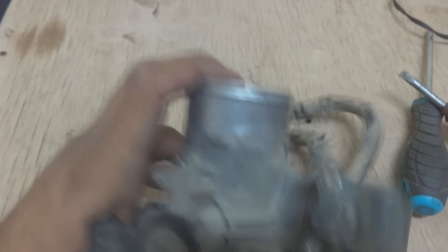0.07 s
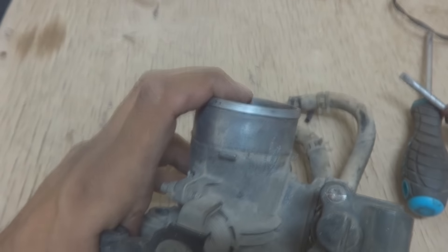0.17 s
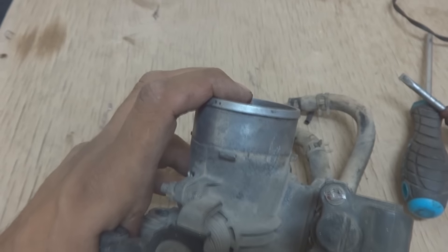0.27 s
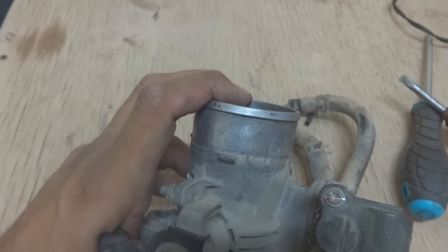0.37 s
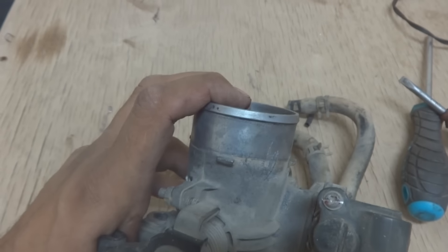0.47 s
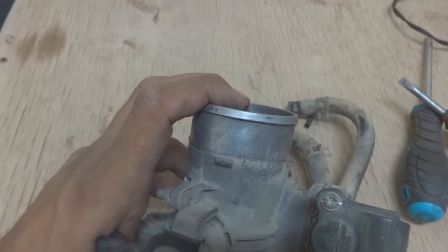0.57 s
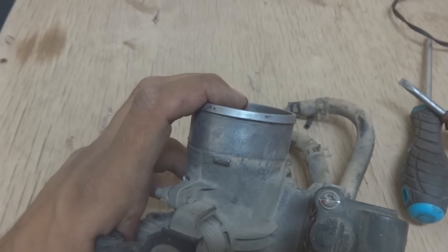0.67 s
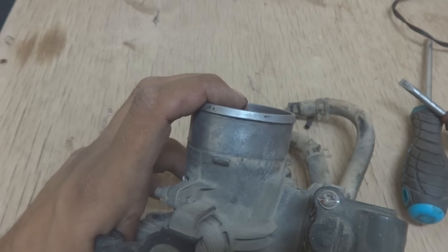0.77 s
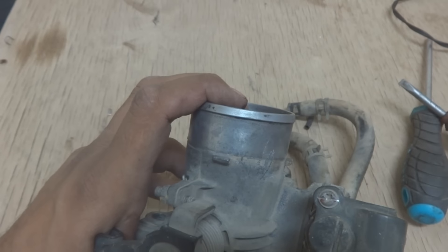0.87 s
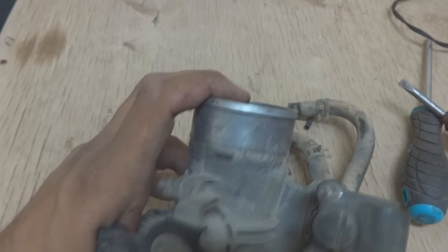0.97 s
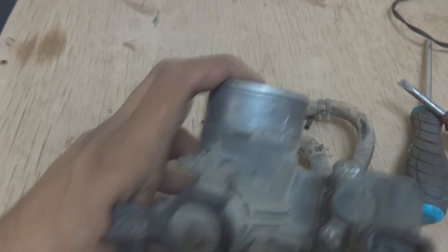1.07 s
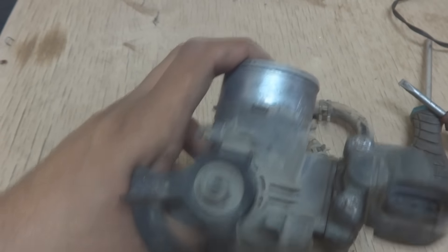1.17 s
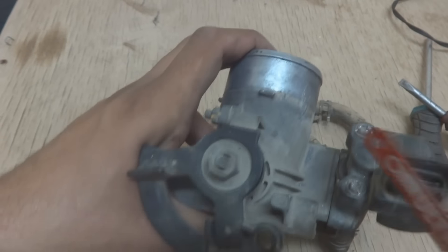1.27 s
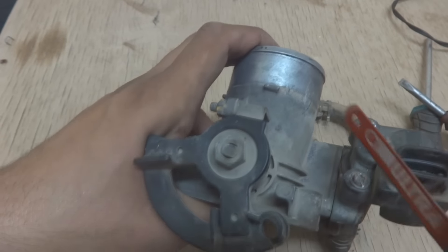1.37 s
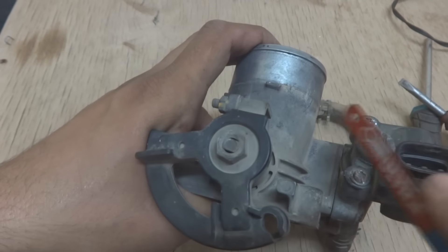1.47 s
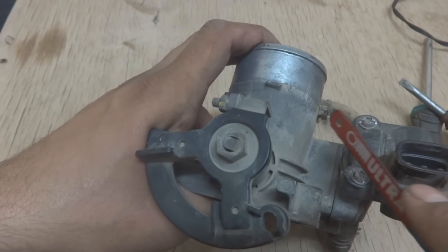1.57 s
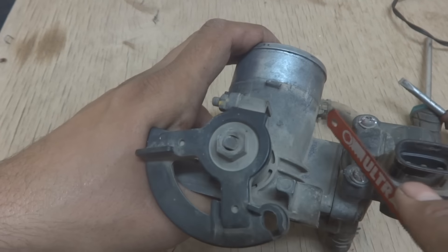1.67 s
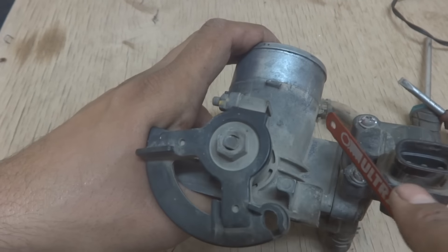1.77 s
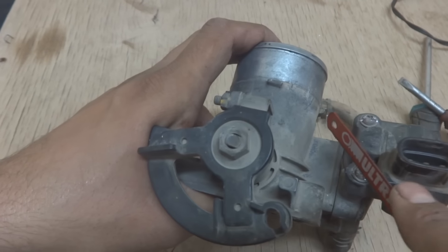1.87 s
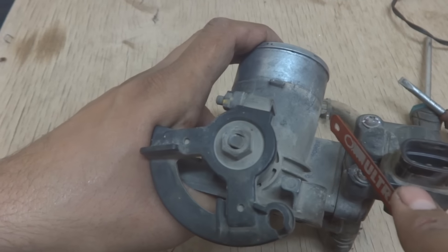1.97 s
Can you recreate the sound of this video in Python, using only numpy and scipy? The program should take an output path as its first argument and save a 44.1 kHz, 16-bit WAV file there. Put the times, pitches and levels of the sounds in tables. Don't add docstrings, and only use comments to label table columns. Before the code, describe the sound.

A heavy metal casting scrapes briefly and drops onto a wooden workbench with a rattling thud.

```python
import sys
import numpy as np
from scipy import signal
from scipy.io import wavfile
from scipy.ndimage import uniform_filter1d

SR = 44100
rng = np.random.default_rng(int(sys.argv[2]) if len(sys.argv) > 2 else 0)


def digitize_waveform(pressure):
    field = np.atleast_2d(pressure).T
    bounded = np.clip(field, -1, 1)
    quanta = np.round(bounded * 32767).astype(np.int16)
    wavfile.write(sys.argv[1], SR, quanta)


def gain_from_db(level_db):
    decades = np.asarray(level_db, float) / 20
    return 10 ** decades


N = 90405

# frequency in Hz, level in dB.
HUM_COLOUR = [(25, -16), (110, -2), (180, -9), (340, -10.5), (700, -19), (1600, -29), (5000, -35.5),
              (15600, -44.5)]
# frequency in Hz, width in Hz, boost in dB.
HUM_PEAKS = [(63, 19, -2.5), (92, 14.6, -1.5), (132.6, 17.8, 6.5), (244, 13, 5)]
# frequency in Hz, likeness up to 1 (anything below 0
HUM_LIKENESS = [(60, 1), (150, 0.9), (380, 0.12), (950, -0.52), (2380, 0.0064), (5980, 0.28), (15000, 1)]
# frequency in Hz, left over right in dB.
HUM_LEAN = [(60, 1.0), (150, 1.0), (380, 2.2), (950, 0.75), (2380, 0.0), (5980, 0.66), (15000, 0.0)]

# time in seconds, level in dB.
BRUSH_SWELL = [(1.0, -97), (1.15, -76), (1.25, -65), (1.32, -56.5), (1.42, -65), (1.6, -70.5), (1.8, -82),
               (2.05, -107)]
# frequency in Hz, level in dB.
BRUSH_COLOUR = [(150, -14), (400, -1), (1000, -4), (1500, -8), (2800, -17.5), (4800, -15), (9000, -24),
                (15000, -33)]

# start in seconds, peak in dB, decay by 60 dB in seconds.
TICKS = [
    (1.1892, -56.5, .02),
    (1.2765, -55.5, 0.036),
    (1.318, -64, 0.024),
    (1.6758, -48.5, 0.031),
    (1.711, -66, 0.011),
]
# frequency in Hz, level in dB.
BLADE_MODES = [(1600, -14), (2100, -10), (2700, -6), (3200, -2), (4500, -25), (5640, 5.5), (8800, -10),
               (10700, -11)]
# frequency in Hz, level in dB.
BLADE_GRIT = [(500, -1), (2000, -1), (3500, -4.5), (7000, -6.5), (15000, -17)]

# time in seconds, level in dB.
DRAG_PRESSURE = [(.146, -93), (.15, -66.5), (.175, -61.5), (.2, -48.5), (.215, -49), (.236, -48),
                 (.26, -47.5), (.29, -52.5), (.31, -80)]
# start in seconds, level in dB.
SLIPS = [
    (0.148, -49.5),
    (0.167, -48.5),
    (.186, -53.5),
    (0.196, -57.5),
    (0.231, -42),
    (0.2553, -35),
    (0.286, -54.5),
]
# frequency in Hz, level in dB.
DRAG_COLOUR = [(250, -4.5), (450, 7.5), (1200, -12.5), (2100, -7), (3400, -17), (5200, -15.5), (8000, -26),
               (15000, -39.5)]

# start in seconds, strength in dB, hardness from 0 to 1, weight on the bench top in dB.
KNOCKS = [(0.189, -55, 0.2, -37.5), (0.202, -50, .1, -34), (0.2121, -43, .1, -26), (0.2174, -61, 0, -32),
          (0.228, -48, 0.05, -51.5), (0.2403, -16, 0.83, -14), (0.2448, -22, 0.74, -20.5),
          (0.2547, -17, 0.73, -21.5), (.2575, -16, 0.92, -24), (.263, -13, 0.82, -23),
          (0.2692, -17.5, 0.6, -27.5), (.279, -15.5, 0.53, -12.5), (.285, -19, 0.63, -11),
          (0.295, -17.5, 0.27, -20), (0.3034, -20, 0.48, -24.5), (.322, -23.5, 0.05, -23)]
# frequency in Hz, level in dB.
THUD_COLOUR = [(100, -20.5), (300, 0), (600, 2), (1000, -5), (1600, -17.5), (3000, -25.5), (6000, -44),
               (15000, -63)]
# frequency in Hz, level in dB, decay by 60 dB in seconds.
BENCH_MODES = [(234, -7.5, .3), (264.2, -7, 0.46), (309, -15, .3), (332, 4.5, .35), (383.4, -8, .25),
               (410, 0, .3), (481.5, 1.5, 0.43), (526, -26, 0.27), (589.4, 0, .3), (720, -20, 0.31),
               (900, -9, .2), (970, -11, .2)]
# frequency in Hz, level in dB, decay by 60 dB in seconds.
BOOM_MODES = [(63.4, -4.5, 1.15), (95.4, -12.5, .5), (115, -10, 0.31), (144.47, 0.5, 0.57), (168, 2, 0.25),
              (195, -10, 0.7)]
# frequency in Hz, level in dB, decay by 60 dB in seconds.
CASTING_MODES = [(1605, -41, 0.21), (2446, -42, .2), (3090, -45, 0.33), (6665, -48.5, 0.42)]

# frequency in Hz, decay by 60 dB in seconds.
ROOM_T60 = [(150, 0.77), (400, 0.48), (1000, 0.45), (1450, 0.49), (2200, 0.36), (3500, 0.31), (6000, 0.4),
            (15000, 0.54)]
# frequency in Hz, starting level in dB.
LATE_TAIL = [(300, -30), (900, -22.5), (1450, -9), (2200, -14), (4000, -16), (9000, -26)]
# frequency in Hz, likeness from 0 to 1.
ROOM_LIKENESS = [(60, 0.97), (150, 1), (380, 0.9), (950, 0.51), (2380, 0.15), (5980, 0.67), (15000, 0.97)]
# frequency in Hz, left over right in dB.
ROOM_LEAN = [(60, 14.5), (150, 11.5), (380, 6.5), (950, 4), (2380, -1), (5980, -1.5), (15000, 2.5)]


def evened(x):
    return x / np.sqrt(np.mean(x ** 2) + 1e-20)


def read(points, hz):
    f, value = np.transpose(points)
    return np.interp(np.log(hz + 1), np.log(f + 1), value)


def curve(points):
    return np.interp(np.arange(N) / SR, *np.transpose(points))


def add(mix, start_s, sound):
    part = mix[round(start_s * SR):][:len(sound)]
    part += sound[:len(part)]


def colour(x, points):
    hz = abs(np.fft.fftfreq(8192, 1 / SR))
    log_gain = np.log(gain_from_db(read(points, hz)))
    taps = np.fft.ifft(np.exp(np.conj(signal.hilbert(log_gain)))).real[:4096]
    return signal.oaconvolve(x, taps / np.linalg.norm(taps))[:len(x)]


def stereo_noise(likeness, lean, shape, length, size):
    frames = length * 4 // size + 5
    hz = np.fft.rfftfreq(size, 1 / SR)[:, None]
    a, b, c, d = rng.standard_normal((frames, len(hz), 4)).T
    shared, own = a + 1j * b, c + 1j * d
    like = np.sqrt(np.clip(read(likeness, hz), 0, 1))
    tilt = gain_from_db(read(lean, hz) / 2)
    left = shared * tilt
    right = (like * shared + np.sqrt(1 - like ** 2) * own) / tilt
    spectra = np.array([left, right]) * gain_from_db(shape(hz, np.arange(frames) * size / 4 / SR))
    return signal.istft(spectra, nperseg=size, noverlap=size * 3 // 4)[1][:, :length]


def patches(hz, t, frames, bins):
    drift = rng.standard_normal((len(t), len(hz)))
    drift = uniform_filter1d(uniform_filter1d(drift, frames, 0), bins, 1)
    return evened(drift).T


def rings(modes, length_s):
    t = np.arange(0, length_s, 1 / SR)
    return sum(gain_from_db(db - 60 * t / t60) * np.sin(2 * np.pi * hz * t) for hz, db, t60 in modes)


def shove(t, rise_s):
    u = t / rise_s
    push = u * np.exp(-u)
    return push / np.sum(push)


def hum():
    def shape(hz, t):
        peaks = sum(db * np.exp(-((hz - f) / width) ** 2) for f, width, db in HUM_PEAKS)
        return read(HUM_COLOUR, hz) + 0.77 * patches(hz, t, 8, 12) + peaks
    return gain_from_db(-54.5) * evened(stereo_noise(HUM_LIKENESS, HUM_LEAN, shape, N, size=2048))


def brush():
    def shape(hz, t):
        flutter = evened(uniform_filter1d(rng.standard_normal(len(t)), 6))
        return read(BRUSH_COLOUR, hz) + 5.2 * patches(hz, t, 10, 8) + 1.1 * flutter
    return gain_from_db(curve(BRUSH_SWELL)) * evened(stereo_noise(HUM_LIKENESS, HUM_LEAN, shape, N, size=256))


def blade():
    out, t = np.zeros(N), np.arange(3000) / SR
    for start_s, db, t60 in TICKS:
        click = colour(rng.standard_normal(len(t)), BLADE_GRIT)
        ring = np.zeros(len(t))
        for hz, mode_db in BLADE_MODES:
            spot = rng.standard_normal()
            ring += gain_from_db(mode_db + 1.2 * spot) * np.sin(2 * np.pi * hz * (1 + .02 * spot) * t)
        add(out, start_s, gain_from_db(db - 60 * t / t60) * (0.19 * ring + 0.63 * click))
    return out


def room(dry_mono):
    late_t60 = 1

    def shape(hz, t):
        early = -60 * t / read(ROOM_T60, hz)
        late = read(LATE_TAIL, hz) - 60 * t / late_t60
        return np.maximum(early, late)
    tail = stereo_noise(ROOM_LIKENESS, ROOM_LEAN, shape, SR, size=512)
    tail = tail / np.linalg.norm(tail[0])
    return signal.fftconvolve(dry_mono[None], tail, axes=1)[:, :N]


def drag():
    grains_per_s, spread_db, slip_s = 1400, 4, 0.012
    sizes = gain_from_db(spread_db * np.minimum(rng.exponential(1, N), 4))
    grains = sizes * (rng.random(N) < grains_per_s / SR)
    grains = evened(grains * rng.choice([-1., 1.], N) + 0.25 * rng.standard_normal(N))
    pressure, t = gain_from_db(curve(DRAG_PRESSURE)), np.arange(2000) / SR
    for start_s, db in SLIPS:
        add(pressure, start_s, gain_from_db(db) * np.exp(-t / slip_s))
    return colour(pressure * grains, DRAG_COLOUR)


def knocks():
    soft_s, hard_s, weight_s, crack_s = 0.001, 0.00055, 0.0011, 0.0043
    push, weight, crack = np.zeros((3, N))
    t = np.arange(900) / SR
    for start_s, db, hard, weight_db in KNOCKS:
        rise_s = soft_s + (hard_s - soft_s) * np.clip(hard, 0, 1)
        grit = rng.standard_normal(len(t))
        add(push, start_s, -gain_from_db(db) * shove(t, rise_s))
        add(weight, start_s, gain_from_db(weight_db) * shove(t, weight_s))
        add(crack, start_s, gain_from_db(db) * hard ** 2 * grit * np.exp(-t / crack_s))
    return push, weight, crack


def casting_on_bench(ticks):
    push, weight, crack = knocks()
    modes = signal.oaconvolve(push, rings(BENCH_MODES, 0.9))[:N]
    modes += signal.oaconvolve(crack, rings(CASTING_MODES, 0.9))[:N]
    boom = gain_from_db(-1.5) * signal.oaconvolve(weight, rings(BOOM_MODES, 1.5))[:N]
    no_deep_bass = signal.butter(4, 88, "high", fs=SR, output="sos")
    modes, boom = signal.sosfilt(no_deep_bass, [modes, boom])
    grit = gain_from_db(5) * colour(crack, THUD_COLOUR) + drag()
    wet = room(grit + ticks)
    late_left = np.array([np.roll(modes, 9), modes])
    body = (gain_from_db(-11) * late_left + boom) * gain_from_db(np.array([[1.6], [-1.6]]))
    return body + grit * gain_from_db(np.array([[.3], [-.3]])) + gain_from_db(-2) * wet


def scene():
    ticks = blade()
    return hum() + brush() + ticks + casting_on_bench(ticks)


def low_pass(x):
    return signal.sosfilt(signal.butter(12, 15720, fs=SR, output="sos"), x)


def record(dry):
    limited = .7 * np.tanh(dry / .7)
    return low_pass(limited)


dry = scene()
out = record(dry)
digitize_waveform(out)
```